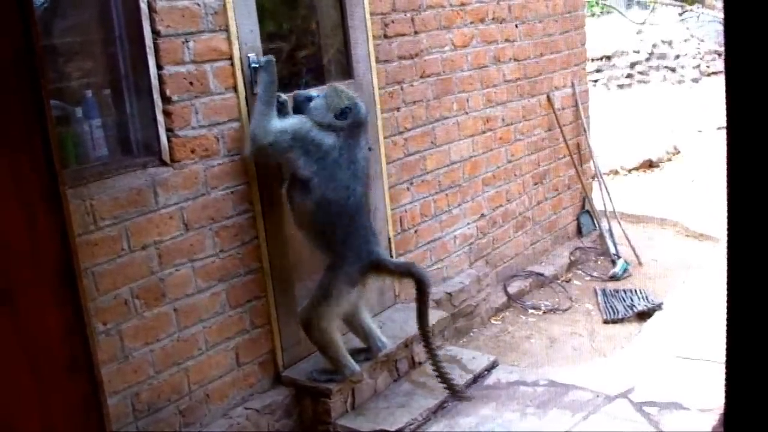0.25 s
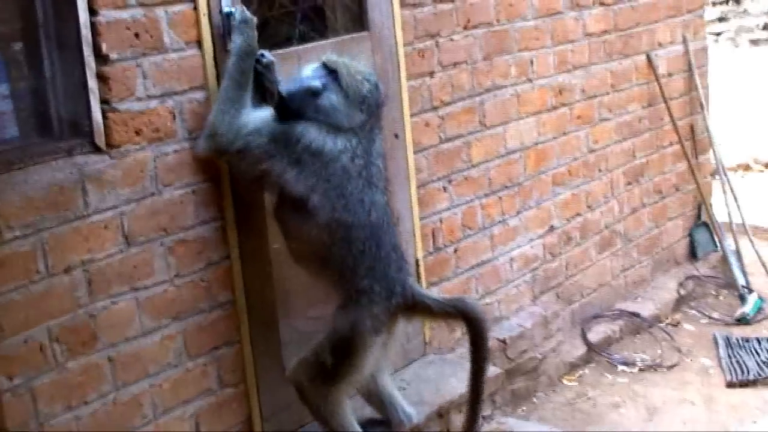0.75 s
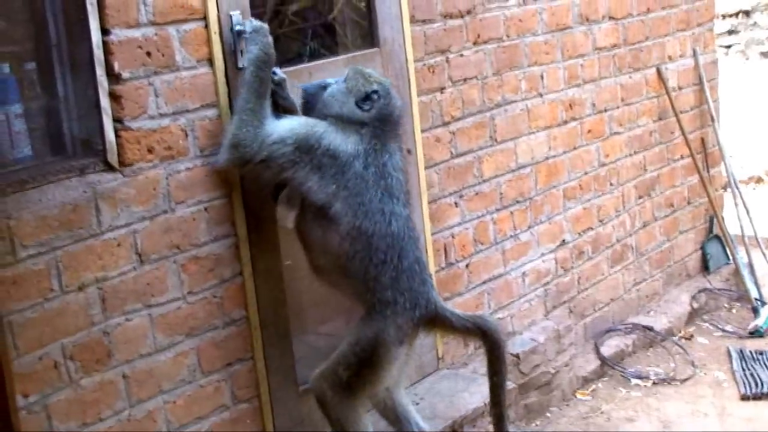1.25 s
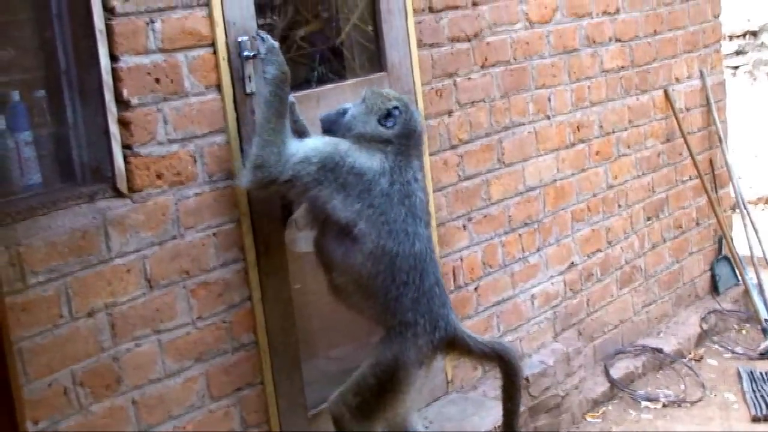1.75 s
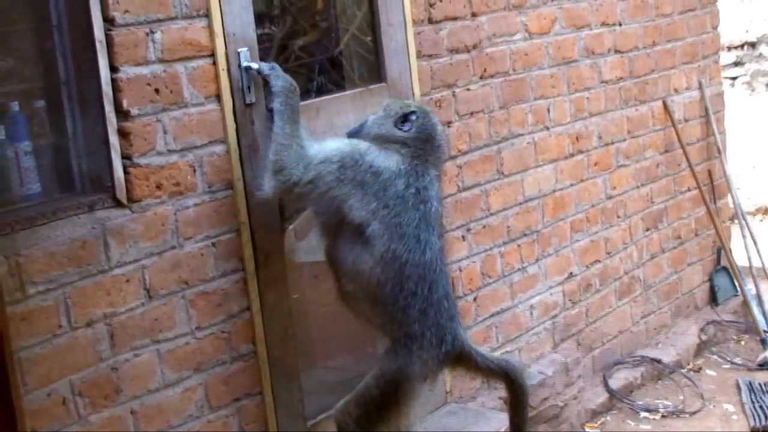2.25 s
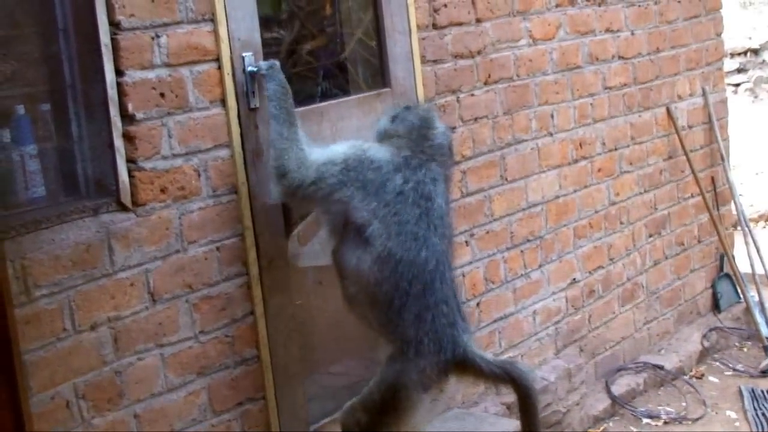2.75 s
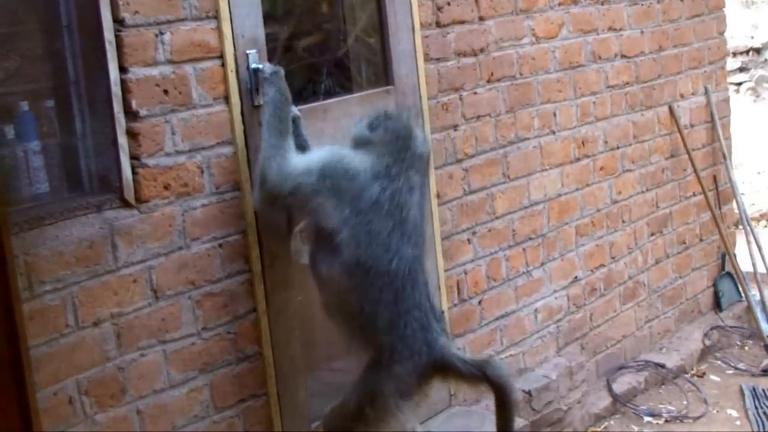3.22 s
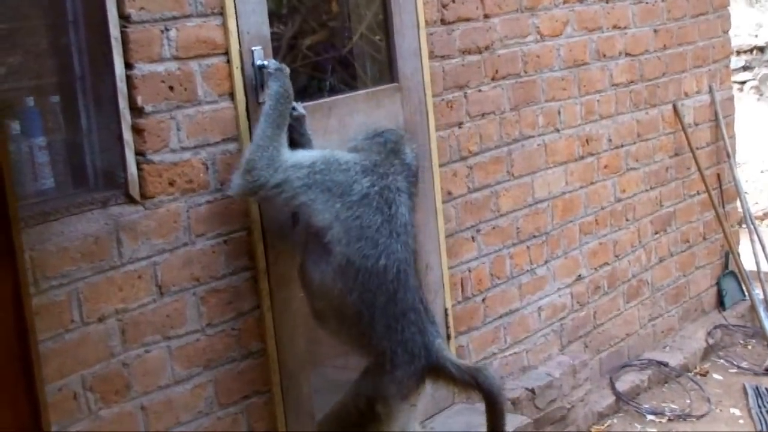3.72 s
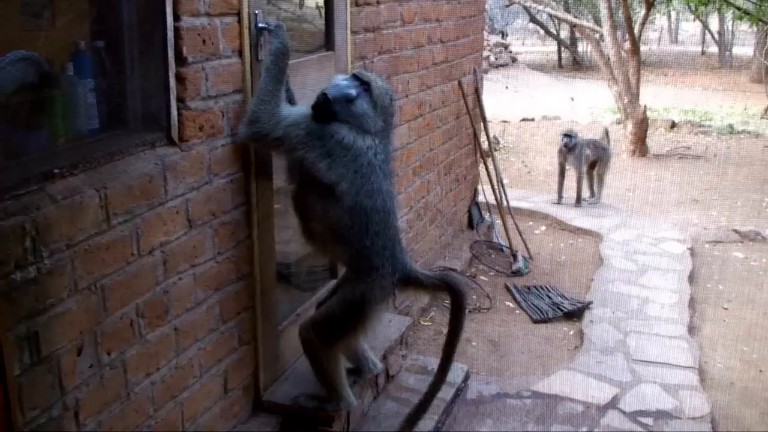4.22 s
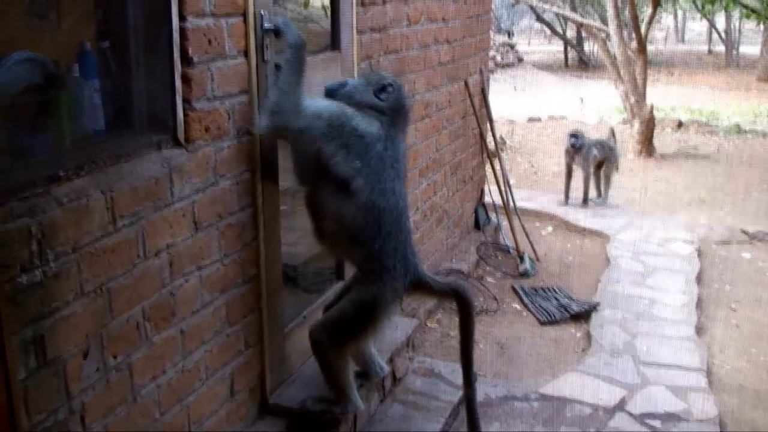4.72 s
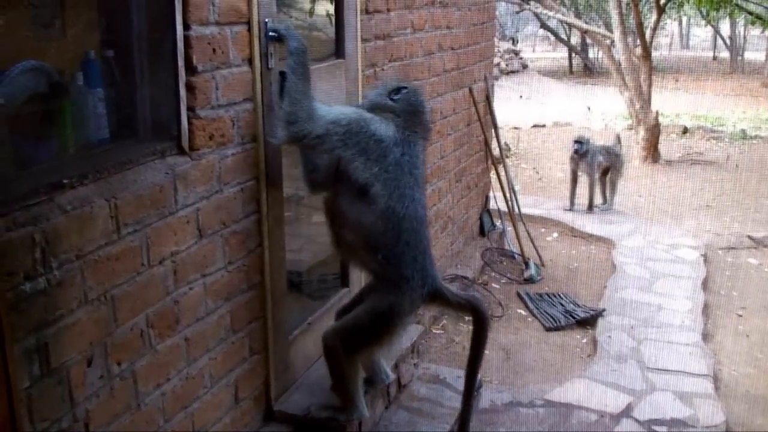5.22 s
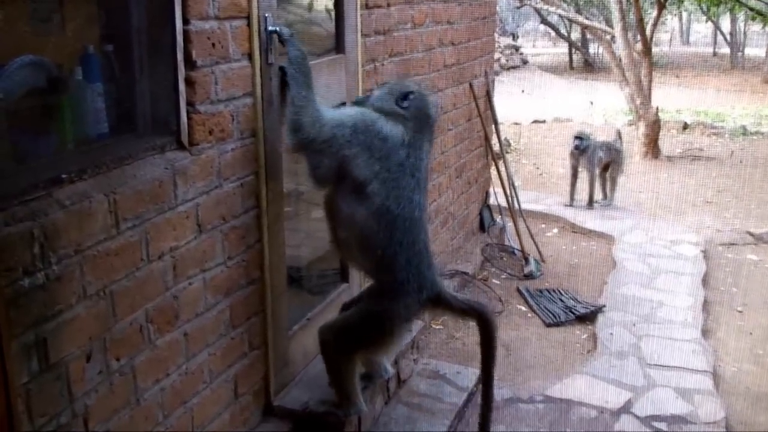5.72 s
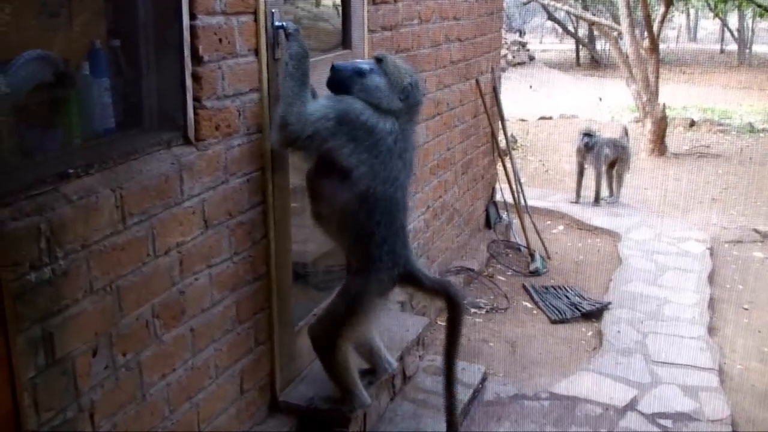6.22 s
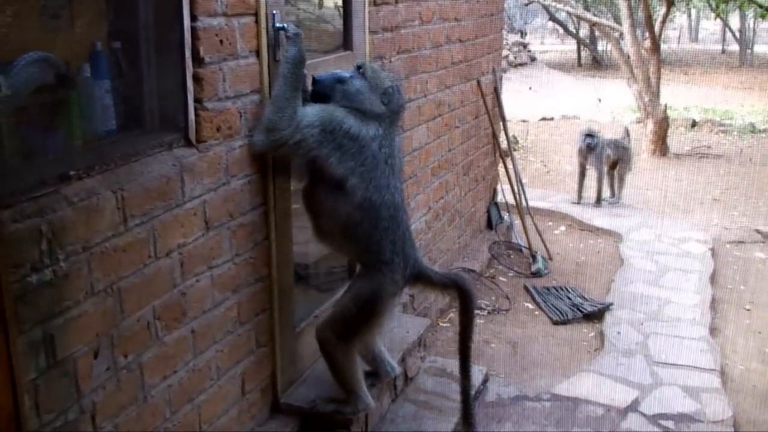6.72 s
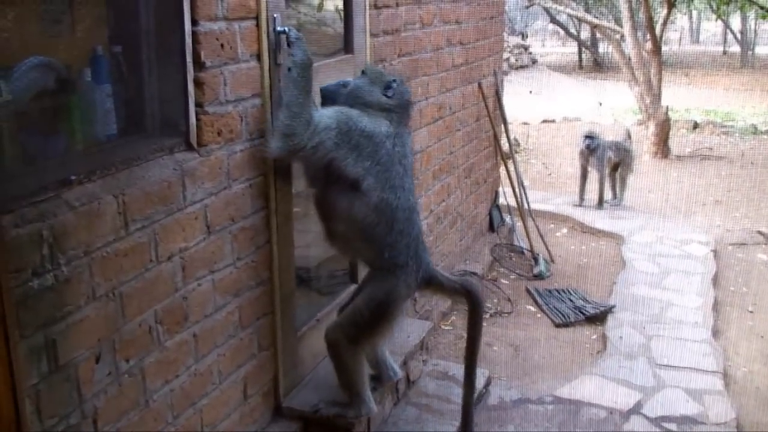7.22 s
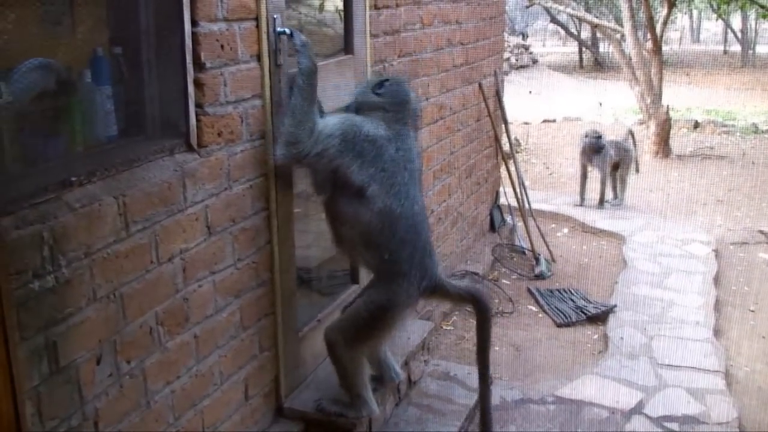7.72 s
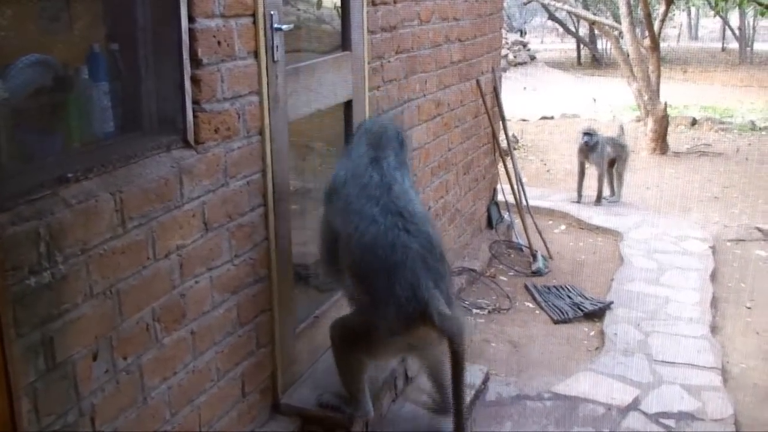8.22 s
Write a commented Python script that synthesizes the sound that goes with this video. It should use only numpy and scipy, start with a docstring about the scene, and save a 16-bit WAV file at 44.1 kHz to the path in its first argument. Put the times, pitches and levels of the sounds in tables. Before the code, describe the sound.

Outside a house, a nearby metal door handle is rattled hard in three bursts, each with ringing lock clatter and deep thuds from the door. In the pauses the baboon fiddles with the clicking latch, and small birds chirp faintly over soft outdoor air. A dull tap and a tiny dropout come midway. At the end the latch clacks again and a paw brushes lightly down the door.

```python
"""A baboon yanks the metal lever of a glazed door in three hard bursts, fiddling with the latch between.
Each yank chatters the bolt, rings the lock metal and thumps the door, which booms into the house.
Small birds whistle over the soft air of the yard; at the end the paw brushes down the door.
Halfway, the sound drops out for an instant and goes on from a second spot, where the metal rings lower."""
import sys
import numpy as np
from scipy import signal
from scipy.fft import rfft, irfft, next_fast_len
from scipy.io import wavfile

SR = 44100
rng = np.random.default_rng(int(sys.argv[2]) if len(sys.argv) > 2 else 0)


def pcm_store(signal):
    """Save signal as 16-bit PCM."""
    levels = np.round(np.clip(np.atleast_2d(signal), -1, 1) * 32767)
    wavfile.write(sys.argv[1], SR, levels.astype(np.int16).T)


N = 373086
T = np.arange(N) / SR
RING_T = np.arange(SR) / SR
FIRST_SPOT_END_S, SECOND_SPOT_START_S = 4.174, 4.195

# yanks of the lever and shoves of the door: (time [s], metal level [dB], door level [dB], chatter [s])
YANKS = [(.001, -19, -20, 0.019), (0.053, -13.5, -24, 0.033), (.0965, -10.5, -21.5, 0.018),
         (0.164, -11.5, -30, 0.0041), (.176, -11, -23, 0.026), (.24, -12, -19.5, .024),
         (.273, -14, -30, 0.017), (.29, -16, -25, 0.027), (.357, -10.5, -23.5, 0.022),
         (.384, -16.5, -21, 0.013), (.413, -10, -24, 0.018), (.472, -13, -24, 0.0095),
         (.514, -19, -30.5, 0.0075), (.554, -23.5, -27.5, 0.018), (2.5286, -14.5, -27, 0.0052),
         (2.536, -15.5, -29.5, .003), (2.574, -20.5, -19.5, 0.0065), (2.636, -14, -20.5, 0.003),
         (2.83, -21.5, -24.5, 0.0095), (2.871, -15.5, -23, 0.0029), (2.914, -11, -27, 0.012),
         (2.941, -9, -18.5, 0.02), (3.008, -9.5, -37, .005), (3.024, -18, -22.5, 0.03),
         (3.083, -13.5, -19, .01), (3.101, -17.5, -23.5, 0.016), (3.164, -13, -17, .011),
         (3.204, -20.5, -20.5, 0.0046), (3.233, -12, -48, .003), (3.268, -10.5, -20.5, 0.037),
         (3.314, -11, -30, 0.013), (3.331, -12.5, -25, 0.014), (3.377, -12, -21.5, 0.023),
         (3.456, -16, -20.5, 0.015), (3.547, -26, -26, 0.0054), (3.72, -38.5, -38, .004),
         (4.195, -43, -26.5, 0.0039), (5.68, -22.5, -24, .008), (5.712, -23.5, -23, 0.036),
         (5.746, -9.5, -17.5, 0.017), (5.813, -10, -16.5, 0.0076), (5.83, -13.5, -19.5, 0.04),
         (5.888, -12, -19, 0.024), (5.968, -10, -18.5, 0.018), (6.049, -9.5, -20, 0.0093),
         (6.068, -12.5, -20, 0.033), (6.143, -9.5, -19, 0.013), (6.167, -12.5, -19, 0.02),
         (6.221, -20, -18, .034), (6.297, -17.5, -21.5, 0.017), (6.359, -27.5, -49, 0.0037),
         (6.387, -18, -28, 0.0047), (6.446, -35, -26.5, 0.0051), (6.533, -37.5, -43, .003)]
# lighter latch clacks: (time [s], metal level [dB], door level [dB], bright edge against metal [dB])
CLACKS = [(0.082, -26.5, -28, -3.5), (1.263, -29.5, -36.5, -11.5), (1.341, -26, -40, -15),
          (1.359, -30.5, -29, -26), (2.109, -40, -33.5, -11), (2.149, -29.5, -35.5, -26),
          (2.286, -32, -36.5, -15.5), (2.378, -30.5, -34, -29), (2.438, -25, -28, -21),
          (2.47, -25.5, -26.5, -13.5), (2.92, -31, -38, 4), (4.2156, -28.5, -34, -40),
          (4.595, -34, -32.5, -12), (4.661, -32.5, -35.5, -12), (4.804, -27, -25.5, -15),
          (4.843, -31, -34.5, -16), (5.155, -32, -30, -8), (5.205, -33, -29.5, -18),
          (5.267, -40.5, -34, -7), (5.32, -28, -25, -5), (5.333, -34, -41.5, -12), (5.6168, -31.5, -24, -9),
          (5.713, -15, -41, -10), (5.733, -18, -39, -3), (5.955, -17.5, -44, -2), (6.039, -16, -37, -6.5),
          (7.83, -22, -27.5, -2), (7.86, -21, -20.5, -13), (7.872, -17, -23.5, -7), (7.881, -21, -35, -4)]
# EQ of the bright edge on a metal hit: (frequency [Hz], level [dB])
EDGE_EQ = [(2000, -78), (4500, -23), (7000, 1), (9500, -0.5), (12000, -11), (16000, -17)]
# resonances of door leaf and pane: (frequency [Hz], t60 [s], lift [dB])
DOOR_MODES = [(122, .25, 0), (174, .2, -2), (295, .25, -4), (405, .2, -2), (780, .05, -1), (845, .05, 0),
              (1345, .06, -4)]


def undb(db):
    """Decibels to gain."""
    return 10 ** (np.asarray(db) / 20)


def on_log_axis(points, hz):
    """Read a (frequency, value) curve along a log frequency axis."""
    f, value = np.transpose(points)
    return np.interp(np.log(np.maximum(hz, 1)), np.log(f), value)


def unit(response):
    """Scale a response to unit energy."""
    return response / np.sqrt(np.sum(response ** 2))


def through(x, response):
    """Convolve mid and side with an impulse response."""
    size = next_fast_len(N + len(response), True)
    return irfft(rfft(x, size) * rfft(response, size), size)[:, :N]


def colour(eq, size=8192):
    """Minimum-phase impulse response of an EQ curve of (frequency [Hz], level [dB])."""
    gain = undb(on_log_axis(eq, np.fft.rfftfreq(size, 1 / SR)))
    cepstrum = irfft(np.log(gain))
    cepstrum[1:size // 2] *= 2
    cepstrum[size // 2 + 1:] = 0
    return irfft(np.exp(rfft(cepstrum)))


def body(eq, modes):
    """A struck body: a broad EQ with ringing modes (frequency [Hz], t60 [s], lift [dB]) on top."""
    ring = signal.unit_impulse(len(RING_T))
    for hz, t60, db in modes:
        fade = undb(-60 * RING_T / t60)
        ring = ring + undb(db) * 2 * fade / fade.sum() * np.cos(2 * np.pi * hz * RING_T)
    return unit(signal.fftconvolve(ring, colour(eq)))


def noise_bands(length, count=19):
    """Mid and side noise split into log-spaced bands that add up to white."""
    spectrum = rfft(rng.standard_normal((2, length)))
    log_hz = np.log(np.maximum(np.fft.rfftfreq(length, 1 / SR), 1))
    centres = np.geomspace(30, 15000, count)
    for hz, pick in zip(centres, np.eye(count)):
        yield hz, irfft(spectrum * np.interp(log_hz, np.log(centres), pick), length)


def wander(rate_hz):
    """Random modulation curve with a spread near 1."""
    knots = np.arange(0, T[-1] + 1, 1 / rate_hz)
    return np.interp(T, knots, rng.standard_normal(len(knots)))


def contacts(times, dbs, crack_s, gap_s, bounce, settle_s, rise_s, count=8, size=3072):
    """Each hit is a gritty crack that swells as the parts meet, then uneven, weakening bounces."""
    force, t = np.zeros((2, N + size)), np.arange(size) / SR
    crack, swell = np.exp(-2 * t / crack_s), 1 - np.exp(-t / rise_s)
    for s, db in zip(times, dbs):
        gaps, strengths = rng.uniform(.5, 1.5, (2, count))
        delays = np.cumsum(gaps) * gap_s
        power = crack.copy()
        for delay, strength in zip(delays, strengths * bounce * np.exp(-delays / settle_s)):
            late = min(int(delay * SR), size)
            power[late:] += strength ** 2 * crack[:size - late]
        grit = np.tanh(rng.standard_normal((2, size))) * np.sqrt(power) * swell
        start = max(int(s * SR), 0)
        force[:, start:start + size] += undb(db) * unit(grit) * np.sqrt(SR / 100)
    return force[:, :N]


def stereo(sound, width, coherence=0, lean=0):
    """Mid and side to left and right; coherent sound enters the side a quarter cycle out of step."""
    mid, side = sound
    spectrum = np.sqrt(1 - coherence ** 2) * rfft(side) - 1j * coherence * rfft(mid) + rfft(lean * mid)
    side = irfft(spectrum * undb(on_log_axis(width, np.fft.rfftfreq(N, 1 / SR))), N)
    return np.array([mid + side, mid - side])


def yard(eq, db):
    """A bed of far wind, leaves and insects: noise bands that swell a little together and flicker alone."""
    swell_db = .5 * wander(2)
    bands = noise_bands(next_fast_len(N, True), count=12)
    air = sum(band[:, :N] * undb(swell_db + 1.1 * wander(10)) for _, band in bands)
    return undb(db) * through(air, unit(colour(eq)))


def house(build_s=.0071):
    """Diffuse reverb of the house behind the door; the lows bloom late and hang longest."""
    # reverb decay: (frequency [Hz], t60 [s])
    decay = [(40, 1.67), (120, 1.03), (260, 0.69), (700, 0.59), (1800, 0.44), (4800, 0.33), (12000, 0.45)]
    tail = 0
    for hz, band in noise_bands(len(RING_T)):
        fade = undb(-60 * RING_T / on_log_axis(decay, hz))
        bloom_s = build_s * np.clip(700 / hz, 1, 4)
        tail = tail + band * unit(fade * (1 - np.exp(-RING_T / bloom_s)))
    return tail


def birds(gain_db=-2, flutter_db=5, octave_db=-22):
    """Short gliding calls with a faint octave, from clear whistles to rasps as pitch and level waver."""
    # bird notes: (time [s], length [s], centre pitch [Hz], glide [octaves], level [dB], waver [ratio])
    notes = [(0.854, 0.034, 4130, 0.065, -48, 0.047), (1.027, 0.032, 3310, -0.21, -52, 0.051),
             (1.193, 0.042, 3555, 0.0025, -32.5, 0.027), (1.53, .06, 1970, .05, -50, 0.24),
             (1.83, 0.037, 3560, -.32, -44, 0.091), (1.856, 0.043, 4800, 0.35, -49, 0.075),
             (1.9, 0.047, 4900, -.4, -53, .08), (1.88, 0.047, 2740, -.15, -47.5, 0.069),
             (2.28, 0.03, 1627, 0.058, -38.5, 0.042), (2.769, 0.17, 3620, -0.26, -39, 0.08),
             (4.031, 0.049, 3300, -0.41, -49, 0.094), (5.083, 0.014, 2950, 0.15, -49.5, 0.024),
             (6.586, 0.022, 3130, -0.45, -45, .03), (7.194, .014, 1565, -0.12, -48, .03)]
    song, wobble = np.zeros(N), wander(900)
    flutter = undb(flutter_db * np.tanh(wander(200)))
    for s, length, centre_hz, glide, db, waver in notes:
        u = np.linspace(-1, 1, int(length * SR))
        span = slice(int(s * SR), int(s * SR) + len(u))
        hz = centre_hz * 2 ** (glide * u / 2) * (1 + waver * wobble[span])
        phase = 2 * np.pi * np.cumsum(hz) / SR
        envelope = np.tanh(6 * np.cos(np.pi * u / 2))
        song[span] += undb(db) * envelope * (np.sin(phase) + undb(octave_db) * np.sin(2 * phase))
    return undb(gain_db) * np.outer([1, .3], song * flutter)


def bump(s=4.069, db=-9):
    """One dull, close tap: an impulse into a damped shell."""
    tap = np.outer([1, .5], signal.unit_impulse(N, int(s * SR)))
    shell = body(eq=[(40, -14), (200, 2.5), (800, -5), (1300, -5), (1900, -20), (7000, -50)],
                 modes=[(213, .012, 2), (776, .05, 8.6)])
    return undb(db) * through(tap, shell)


def paw_scuff(span_s=(8.085, 8.195), db=-44.5):
    """The paw lets go and brushes down the door: a soft, bright scrape."""
    swell = np.sin(np.pi * np.interp(T, span_s, [0, 1]) ** 2) ** 2
    grit = rng.standard_normal((2, N)) * undb(4 * np.tanh(wander(300))) * swell
    return undb(db) * through(grit, unit(colour([(400, -8), (9000, 0), (15000, -7)])))


def door_sway(s, door_db, hz=33, t60=.82, gain_db=-10):
    """The yanks rock the whole door on its hinges: a sub-bass throb."""
    push = np.zeros(N)
    push[(s * SR).astype(int)] = undb(door_db + gain_db) * np.sqrt(SR / 100)
    throb = np.sin(2 * np.pi * hz * RING_T) * undb(-60 * RING_T / t60)
    return through(np.outer([1, .5], push), unit(throb))


def frame_thuds():
    """The leaf hits its frame squarely: short wooden thuds."""
    # hits on the frame: (time [s], level [dB])
    thuds = [(0.089, -21), (.411, -28), (2.639, -24), (2.934, -20.5), (4.221, -29.5), (4.807, -37),
             (4.85, -32.5), (5.331, -29.5), (5.752, -18.5), (5.974, -26.5), (6.048, -16), (6.304, -26.5),
             (7.883, -34)]
    s, db = np.transpose(thuds)
    force = contacts(s, db, crack_s=.004, gap_s=.002, bounce=.9, settle_s=.006, rise_s=.001)
    return through(force, body([(40, -9.5), (300, 2), (850, -6), (1600, -6), (5000, -44)], DOOR_MODES))


def door(s, door_db, lag_s=.004, clack_db=-2, low_cut_hz=150):
    """The heavy leaf and loose pane shake just after each yank; latch clacks stir them with less bass."""
    # EQ of the door: (frequency [Hz], level [dB])
    door_eq = [(40, -2), (85, -5), (260, -2), (500, -4.5), (1000, -6.5), (3500, -12.5), (6000, -32),
               (14000, -54.5)]
    clack_s, _, clack_door_db, _ = np.transpose(CLACKS)
    hard = contacts(s + lag_s, door_db,
                    crack_s=.0028, gap_s=.005, bounce=.76, settle_s=.0094, rise_s=.0026)
    light = contacts(clack_s, clack_door_db + clack_db,
                     crack_s=.0024, gap_s=.0037, bounce=.67, settle_s=.0085, rise_s=.00064)
    light = signal.sosfilt(signal.butter(2, low_cut_hz, "high", fs=SR, output="sos"), light)
    return through(hard + light, body(door_eq, DOOR_MODES))


def latch_drag(grit_db=4):
    """The latch sticks and slips on its plate, pressing harder until it catches."""
    # scrapes: (time [s], length [s], level [dB])
    drags = [(2.625, 0.013, -29), (4.768, 0.04, -43), (5.321, .024, -35), (7.785, .03, -42.5)]
    pressure = sum(undb(db) * np.interp(T, [s, s + length, s + length + .005], [0, 1, 0]) ** .5
                   for s, length, db in drags)
    return pressure * rng.standard_normal((2, N)) * undb(grit_db * np.tanh(wander(350)))


def lock(force, grips=3, detune=.003, scatter_db=2.5):
    """The lock metal rings a little differently with each grip; each spot hears its own mix of modes."""
    # lock resonances: (frequency [Hz], t60 [s], lift at first spot [dB], lift at second spot [dB])
    lock_modes = [(2185, .06, -4, 1), (2455, .1, 6, 6), (2980, .05, -1, -1), (3575, .06, -7, 3),
                  (4215, .04, 8, 13.5), (4290, .035, -8, 7), (4440, .04, 2, -5), (4910, .04, 7, -5),
                  (5150, .04, 1, -10), (5658, .05, 13, -1), (7420, .06, 1, -6)]
    # EQ of a hard knock: (frequency [Hz], level at first spot [dB], level at second spot [dB])
    knock_eq = [(195, -7, -10.5), (860, -3.5, 3), (1900, -1.5, 0), (3060, 3.5, 10.5), (4900, 7, -4.5),
                (6800, -10, -6), (9020, -14.5, -13.5), (14600, -54, -49)]
    hz, t60, first_db, second_db = np.transpose(lock_modes)
    spots = [(T < FIRST_SPOT_END_S, np.array(knock_eq)[:, [0, 1]], first_db),
             (T > SECOND_SPOT_START_S, np.array(knock_eq)[:, [0, 2]], second_db)]
    grip = np.searchsorted(np.sort(np.transpose(YANKS)[0]), T) % grips  # next grip at every yank
    grip_db = scatter_db * rng.standard_normal((grips, len(hz)))
    grip_db -= grip_db.mean(axis=0)
    ring = 0
    for k, tightness in enumerate(np.linspace(-1, 1, grips)):
        for heard, eq, lift_db in spots:
            modes = zip(hz * (1 + detune * tightness), t60, lift_db + grip_db[k])
            ring = ring + through(force * (heard & (grip == k)), body(eq, modes))
    return ring


def latch(gain_db=-2, edge_db=-3, lock_db=-12, slide_lead_s=.02, slide_db=-15):
    """The latch slides, then clacks on its strike plate, ringing the lock only a little."""
    # EQ of a clack: (frequency [Hz], level [dB])
    clack_eq = [(200, -5), (480, 3), (750, 6), (2400, 10.5), (3500, 5.5), (6000, 2), (15000, -29)]
    # resonances of latch and strike plate: (frequency [Hz], t60 [s], lift [dB])
    plate_modes = [(758, 0.037, 11), (1380, 0.06, 7), (1950, 0.04, 5), (2450, 0.05, 0), (3720, .04, -1)]
    s, metal_db, _, sharp_db = np.transpose(CLACKS)
    clack = contacts(s, metal_db + gain_db,
                     crack_s=.0072, gap_s=.003, bounce=.99, settle_s=.0077, rise_s=.000097)
    slide = contacts(s - slide_lead_s, metal_db + slide_db,
                     crack_s=.0039, gap_s=.0016, bounce=1, settle_s=.12, rise_s=.054)
    edge = contacts(s, metal_db + sharp_db + edge_db,
                    crack_s=.00057, gap_s=.0014, bounce=.87, settle_s=.0098, rise_s=.00024)
    plate = through(clack + slide + latch_drag(), body(clack_eq, plate_modes))
    return plate + undb(lock_db) * lock(clack) + through(edge, unit(colour(EDGE_EQ)))


def bolt_chatter(hits=5, gap_s=.012, jitter=.25, rebound_db=-3, fall_db=-3):
    """Each yank is one hit and fading rebounds between the stops; gives times, metal dB and door dB."""
    s, metal_db, door_db, chatter_s = np.transpose(YANKS)[:, :, None]
    gaps = gap_s * (1 + jitter * rng.uniform(-1, 1, (len(YANKS), hits)))
    delay = np.cumsum(gaps, axis=1) - gaps
    loss_db = rebound_db * (delay > 0) + fall_db * (delay / chatter_s) ** 2
    return (s + delay).ravel(), (metal_db + loss_db).ravel(), (door_db + loss_db).ravel()


def lever(s, metal_db, gain_db=-3, edge_db=-18, edge_scatter_db=4):
    """Lever and bolt slam against their stops and ring the lock metal."""
    force = contacts(s, metal_db + gain_db,
                     crack_s=.003, gap_s=.003, bounce=.65, settle_s=.008, rise_s=.0007)
    # the bright edge grows with the square of a hit's strength and with how squarely the parts meet
    squareness_db = edge_scatter_db * rng.uniform(-.85, 1, len(s))
    edge = contacts(s, 2 * metal_db + squareness_db + edge_db,
                    crack_s=.0013, gap_s=.0015, bounce=1, settle_s=.023, rise_s=.0015)
    return lock(force) + through(edge, unit(colour(EDGE_EQ)))


def scene(door_direct_db=-6, metal_send_db=-14, frame_send_db=-6, bird_send_db=-5, first_lean=.27):
    """Metal, door and birds, direct and through the house reverb, over the air of the yard."""
    # EQ of the metal passing through the shut door: (frequency [Hz], level [dB])
    muffle_eq = [(3000, 2.5), (5500, 1), (9000, -0.5)]
    # EQ of the yard air at each spot: (frequency [Hz], level [dB])
    first_air_eq = [(25, 17), (170, 1), (450, 0.5), (590, 7.5), (720, 2), (1300, -3.5), (3000, -6),
                    (4400, 1), (6200, -13), (8000, -12), (10500, -23.5)]
    second_air_eq = [(25, 11.5), (170, 1), (600, 2), (850, 4), (1100, -4), (2200, -6.5), (3600, -12),
                     (6000, -9), (15000, -25)]
    # stereo width of sources and reverb, and of the air: (frequency [Hz], side against mid [dB])
    width = [(60, -18), (200, -25), (700, -16), (2400, -10.5), (4400, -9.5), (6000, -4), (8200, 1),
             (11000, -11), (15000, -52)]
    air_width = [(60, -13), (300, -1), (4400, -3), (8100, 6.5), (11000, -9)]
    s, metal_db, door_db = bolt_chatter()
    metal = lever(s, metal_db) + latch()
    leaf = door(s, door_db)
    frame = frame_thuds() + door_sway(s, door_db)
    song = birds()
    muffled = through(metal, colour(muffle_eq))
    send = undb(metal_send_db) * muffled + undb(bird_send_db) * song + leaf + undb(frame_send_db) * frame
    reverb = through(send[:1], house())
    direct = metal + undb(door_direct_db) * leaf + frame + song + bump() + paw_scuff()
    air = np.where(T < SECOND_SPOT_START_S, yard(first_air_eq, db=-52), yard(second_air_eq, db=-53))
    lean = first_lean * (T < FIRST_SPOT_END_S)  # from the first spot the door sits a little left
    return stereo(direct, width, coherence=.84, lean=lean) + stereo(reverb, width) + stereo(air, air_width)


def record(dry, ceiling=.8, top_hz=15500):
    """Soft-clip the peaks, mute the instant between the two spots and cut the top."""
    gate = (T < FIRST_SPOT_END_S) | (T > SECOND_SPOT_START_S)
    rounded = ceiling * np.tanh(dry / ceiling)
    return signal.sosfilt(signal.ellip(10, .2, 80, top_hz, fs=SR, output="sos"), rounded * gate)


dry = scene()
out = record(dry)
pcm_store(out)
```